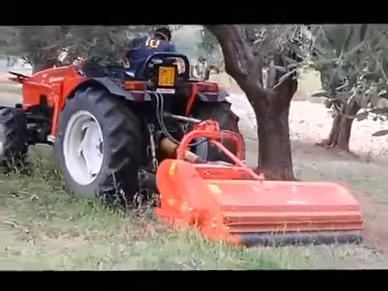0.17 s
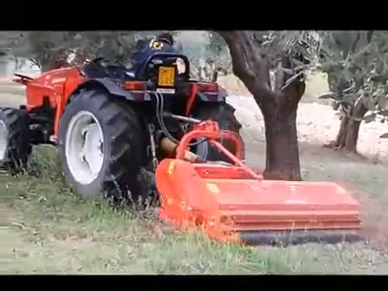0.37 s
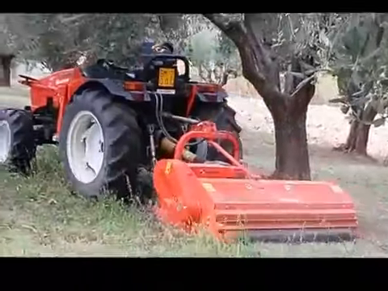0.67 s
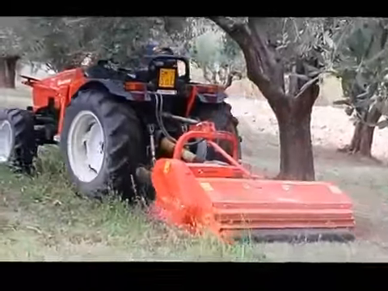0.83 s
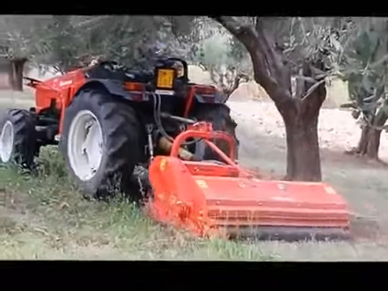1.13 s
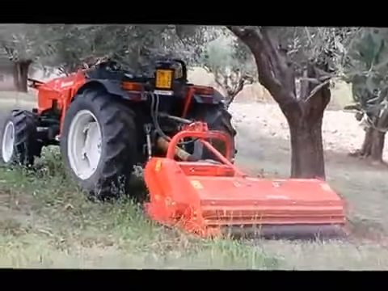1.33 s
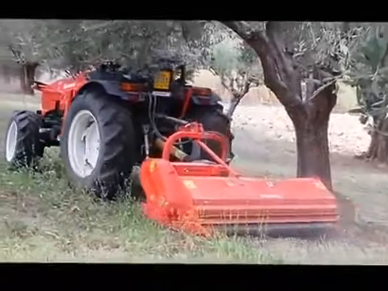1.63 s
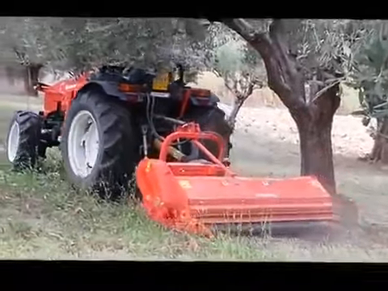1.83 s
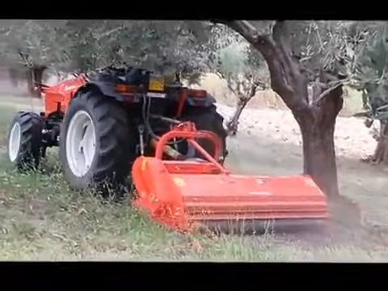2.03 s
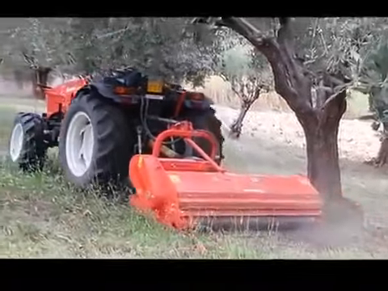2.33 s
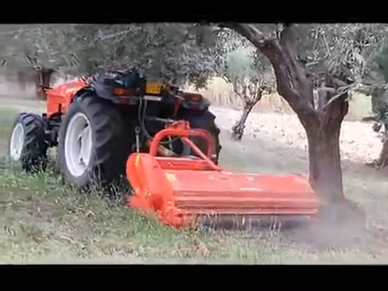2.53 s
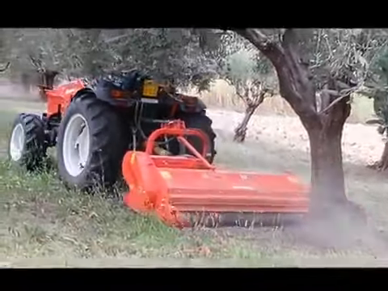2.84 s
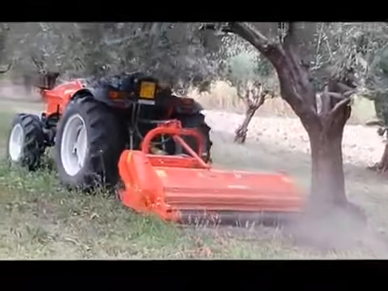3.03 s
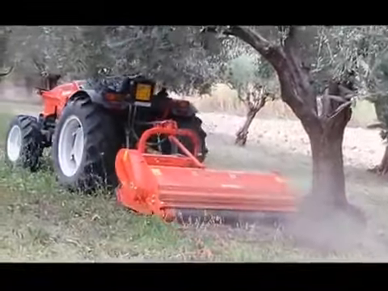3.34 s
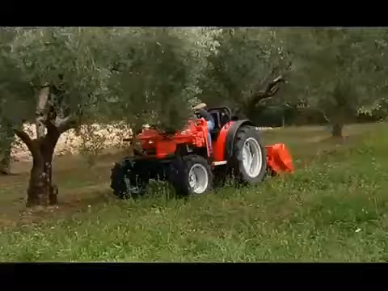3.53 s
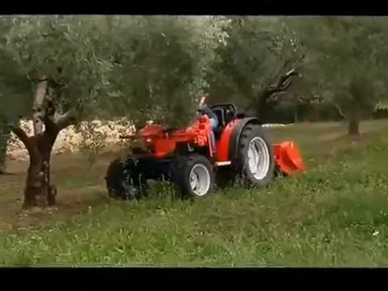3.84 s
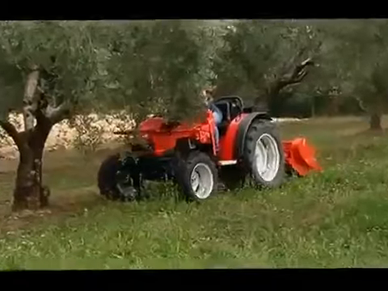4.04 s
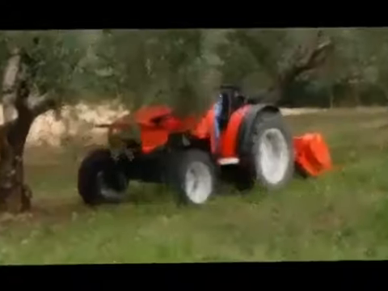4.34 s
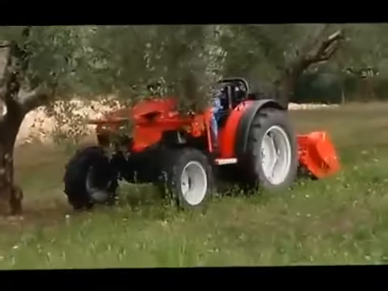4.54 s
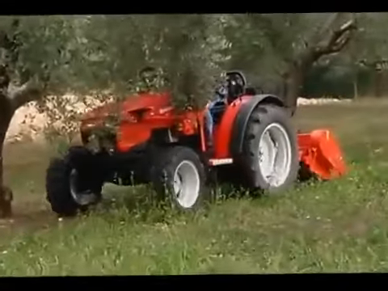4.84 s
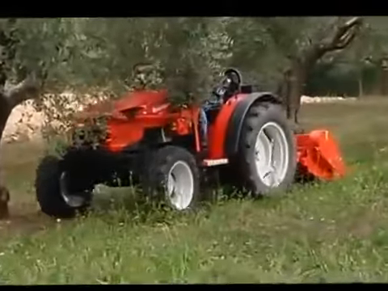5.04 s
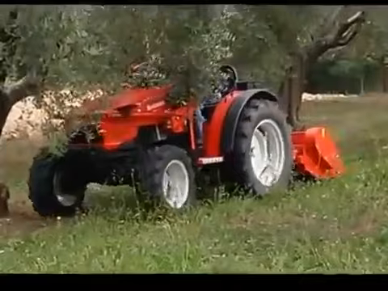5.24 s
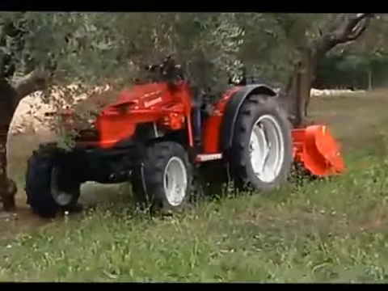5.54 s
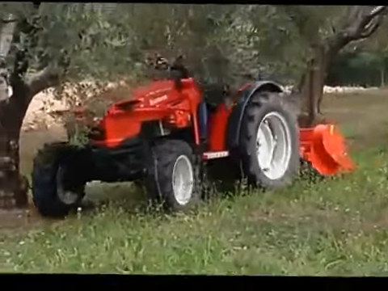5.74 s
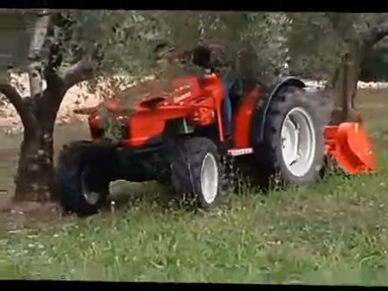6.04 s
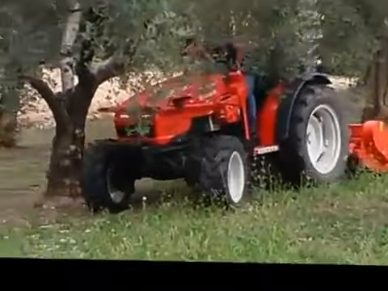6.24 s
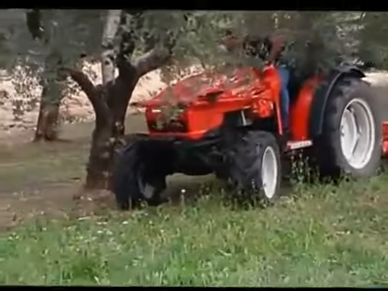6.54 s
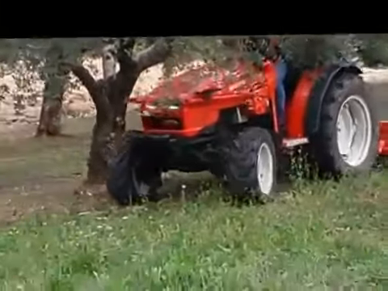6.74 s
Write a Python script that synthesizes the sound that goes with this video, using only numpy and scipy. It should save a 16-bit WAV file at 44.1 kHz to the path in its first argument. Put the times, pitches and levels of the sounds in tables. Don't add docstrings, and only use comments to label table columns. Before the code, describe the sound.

Close behind a working tractor outdoors, a low diesel drone and rattling sheet-metal roar mix with bright, crackling shredding of grass. Tufts and twigs snap in uneven bursts and stones knock the steel hood. The noise thins, cuts to silence for under a second, then returns from the front as a steadier, darker drone with light clatter and a few ticks.

```python
import sys
import numpy as np
from scipy import signal
from scipy.fft import rfft, irfft, next_fast_len
from scipy.io import wavfile
from scipy.ndimage import uniform_filter1d

SR = 44100
rng = np.random.default_rng(int(sys.argv[2]) if len(sys.argv) > 2 else 0)


def volts_from_db(level):
    exponent = np.asarray(level, float) / 20
    return 10 ** exponent


def inscribe(sig):
    pcm = np.round(np.clip(np.atleast_2d(sig).T, -1, 1) * 32767)
    wavfile.write(sys.argv[1], SR, pcm.astype(np.int16))


N = 303849
SIZE = next_fast_len(N)
HZ = np.maximum(np.arange(SIZE // 2 + 1) * SR / SIZE, 1)
TIME = np.arange(N) / SR
SPLIT_S = 4.1

# (behind [Hz], front [Hz])
FIRING_HZ = (56.95, 58.26)
# (multiple of firing [-], level re second order [dB])
ORDERS_BEHIND = [(3, -9), (4, -14), (4.25, -14), (5, -16), (2.25, -18), (3.33, -14.5)]
# (multiple of firing [-], level re second order [dB])
ORDERS_FRONT = [(1.5, -15), (3, -16), (3.5, -11.5), (4, -10.5), (4.25, -15.5), (4.85, -17.5), (1.25, -21)]
# (multiple of tooth rate [-], level re roar [dB])
PUMP_BEHIND = [(3, -11), (5, -11.5), (6, -16), (7, -18), (8, -15)]
# (multiple of tooth rate [-], level re roar [dB])
PUMP_FRONT = [(3, -8.5), (6, -21)]
# (frequency [Hz], density [dB per Hz])
ROAR_BEHIND = [(35, -69.5), (70, -60.5), (130, -60.5), (250, -60.5), (400, -67), (470, -73), (540, -69),
               (600, -64.5), (760, -58.5), (930, -61), (1200, -61.5), (1450, -59.5), (1600, -61),
               (2000, -61), (2500, -63.5)]
# (frequency [Hz], density [dB per Hz])
ROAR_FRONT = [(35, -76), (70, -64.5), (130, -58.5), (250, -61), (400, -70), (520, -67.5), (600, -63),
              (760, -58.5), (930, -66.5), (1200, -61.5), (1450, -63), (1600, -64), (2000, -61), (2500, -65)]
# (frequency [Hz], width [Hz], gain [dB])
RINGS_BEHIND = [(703, 29, 5), (1437, 70, 3), (1600, 40, 4.5), (2100, 65, 3.5), (2950, 73, 2),
                (250, 14, 3.5)]
# (frequency [Hz], width [Hz], gain [dB])
RINGS_FRONT = [(709, 34, 5.8), (844, 30, 6.6), (1457, 80, 4), (1916, 56, 4.6), (2047, 50, 5.1),
               (2270, 45, 4.1)]
# (frequency [Hz], density [dB per Hz])
LEFT_BEHIND = [(1500, -63.5), (2100, -60.5), (2600, -61.5), (3400, -63.5), (3800, -63.5), (4100, -55),
               (5400, -56.5), (6000, -57.5), (8000, -57), (9800, -68), (11000, -67), (12500, -79.5),
               (14000, -70.5), (15500, -86)]
# (frequency [Hz], density [dB per Hz])
RIGHT_BEHIND = [(1500, -62), (2000, -56), (3000, -57), (3300, -67), (3800, -59), (4600, -60), (5000, -68),
                (6000, -61), (7200, -56.5), (7900, -50), (9000, -57.5), (11500, -63), (13000, -67.5),
                (15500, -75.5)]
# (frequency [Hz], density [dB per Hz])
LEFT_FRONT = [(1500, -61.5), (2050, -67.5), (2600, -70), (3300, -74.5), (3800, -74), (4300, -69.5),
              (5000, -67.5), (6200, -61.5), (7000, -67.5), (8200, -75.5), (10500, -75), (11300, -92),
              (13000, -90), (15500, -101.5)]
# (frequency [Hz], density [dB per Hz])
RIGHT_FRONT = [(1500, -59.5), (2050, -65), (2600, -70), (3300, -69.5), (3900, -84), (4400, -78),
               (5200, -72), (6500, -70.5), (7600, -56.5), (8200, -59), (9500, -66.5), (10800, -74.5),
               (12300, -71.5), (15500, -84)]
# (frequency [Hz], left-right correlation [-])
ALIKE_BEHIND = [(60, 0.88), (290, 0.8), (640, 0.79), (1400, .75), (2756, .65), (3150, 0.12), (3500, .5),
                (4000, 0.27), (5500, 0.089), (7700, .3), (15000, .05)]
# (frequency [Hz], left-right correlation [-])
ALIKE_FRONT = [(60, 1), (290, 0.87), (640, 0.95), (1400, 0.96), (3100, 1), (3450, 0.092), (6200, 0.36),
               (9000, 0.11), (15000, .05)]
# (frequency [Hz], phase [rad])
PORT_PHASE_RAD = [(2900, 0), (3500, 3.0), (4500, 4.5), (6200, 7.8), (8000, 8.3)]
# (time [s], recorder gain [dB], grass load on flails [dB])
WORK = [
    [(0.0, -2, -7), (0.21, -0.6, -3.5), (0.42, -.8, 0.3), (0.77, 0.7, -1.5), (1.0, -2.1, 5.5),
     (1.4, -1.7, 4.5), (1.55, 0.4, -1), (1.85, 2.5, -2), (2.25, -0.5, 6), (2.36, 2.2, 0.5),
     (2.5, -0.5, 5.5), (2.6, -7, 7.5), (2.83, -7.5, 0.8), (2.95, -11, 0.5), (3.3, -12, -2),
     (3.7, -3.5, -4.5)],
    [(4.6, 0, -0.9), (6.8, 0.16, 0.45)],
]
# (firing [dB], second order [dB], rotor [dB], roar [dB], shredding [dB])
LEVELS_DB = [
    (-35.5, -33.5, -35, -31.5, -24.5),
    (-31.5, -34, -40.5, -32, -29),
]
# (time [s], peak [dB], left-right [dB],
# fall [ms])
TUFTS = [(0.2344, -8.5, -1.1, 35), (0.33, -1.5, 0.8, 37), (0.4094, -9.5, -1, 29), (0.4703, -7, -6.5, 18),
         (0.4958, -11, -8, 18), (0.6514, -9, -2, 24), (0.6944, -9.5, -1, 14), (0.8294, -4, 1, 62),
         (0.9144, -11, -4, 21), (1.044, 0.5, 1.2, 24), (1.0694, -7, 3, 21), (1.1294, -8.5, -4.5, 18),
         (1.2594, -11, -5.5, 18), (1.4157, -2, 2.5, 14), (1.6044, -6.5, 3.5, 14), (1.8694, -10, -3, 18),
         (1.948, -7.5, 7, 16), (2.0253, -7.5, 5, 18), (2.074, -5.5, 2.5, 22), (2.128, -3.5, 2, 27),
         (2.1894, -5.5, 4, 22), (2.2303, -6, 4, 27), (2.271, -4, 8, 18), (2.3894, -8.5, -2, 30),
         (2.4494, -4, 6, 24), (2.5044, -8, 4.5, 26), (2.5694, -8, 3.5, 35), (2.6214, -10.5, 3.5, 32),
         (2.6725, -9.5, 2.5, 9.7),
         (2.7794, -17, 4.5, 22), (2.832, -7, 2, 22), (2.945, -13.5, 6.5, 35), (3.0415, -17.5, -8, 15),
         (3.424, -13.5, -0.5, 30), (3.4642, -18, 5, 28), (3.5494, -18, 3.5, 18), (3.677, -16.5, 1, 22),
         (3.698, -7, 0.5, 20), (6.1072, -18.5, 7.5, 18), (6.322, -19.5, -9, 16), (6.846, -5, 8.5, 20),
         (6.8744, -9, 6, 16)]
# (time [s], peak [dB], panel index, rounded down [-], rise [ms])
STONES = [(2.5553, -2, 0.5, .4), (.3318, -13, 0, 0.34), (2.8335, -10, 5, .4), (6.2, -19, 5, .3),
          (6.3235, -16.5, 5, 0.32), (3.546, -26, 1.5, 5.2), (1.52, -20.5, 2, 2.7), (6.847, -13.5, 3, 0.66),
          (2.503, -19.5, 4, 3), (6.2, -20, 5, .3), (5.2485, -14, 5, .3), (5.3378, -13, 5, 0.34),
          (2.955, -32, 4.5, 4.0)]
# (frequency [Hz], level [dB], t60 [s])
PANELS = [
    [(4694, 1.5, .015), (4320, -4.5, 0.011), (5200, -4.5, .01), (5030, -11, 0.087), (14500, -10, .006)],
    [(1974, 4, .13), (2780, -5.5, .11), (4511, 1, 0.13), (5496, -6, .1), (6681, -13.5, .12),
     (7897, -14.5, .16)],
    [(7140, 6, .08)],
    [(3400, -9.5, 0.11), (5460, -2.5, 0.1), (6580, 0.5, 0.075), (7130, 2, .04)],
    [(672, -4.5, 0.19), (817, -2.5, .12), (1039, -0.5, .1), (1403, -1.5, 0.11), (1590, 0, 0.13)],
    [(5230, 0, 0.0074), (6670, 0, 0.0074), (7800, 0, 0.011)],
]


def in_time(rows):
    time_s, *columns = np.transpose(rows)
    return [np.interp(TIME, time_s, column) for column in columns]


def at_hz(points):
    hz, value = np.transpose(points)
    return np.interp(np.log(HZ), np.log(hz), value)


def drift(rate_hz):
    pole = np.exp(-80 * np.pi * rate_hz / SR)
    noise = rng.standard_normal(N // 40 + 2002)
    slow = signal.lfilter([1], [1, -2 * pole, pole * pole], noise)[2000:]
    return np.interp(np.arange(N) / 40, np.arange(len(slow)), slow / slow.std())


def slope(corner_hz, db_per_octave):
    return -np.maximum(np.log2(corner_hz / HZ) * db_per_octave, 0)


def humps(rings):
    return sum(db / (1 + (2 * (HZ - hz) / width_hz) ** 2) for hz, width_hz, db in rings)


def colour(pair, left_db, right_db, alike, low_hz, high_hz):
    mid, side = rfft(pair, SIZE)
    likeness = at_hz(alike)
    gains = volts_from_db(np.array([left_db, right_db]))
    band = (HZ > low_hz) & (HZ < high_hz)
    gains = gains / np.sqrt(np.sum(gains[:, band] ** 2) / 2 / len(HZ))
    common = np.sqrt((1 + likeness) / 2) * mid
    ports = common + np.sqrt((1 - likeness) / 2) * side * [[1], [-1]]
    ports[1] *= np.exp(1j * at_hz(PORT_PHASE_RAD))
    return irfft(gains * ports, SIZE)[:, :N]


def tones(turns, table, wobble_db):
    total = 0
    for multiple, db in table:
        phase = 2 * np.pi * (multiple * turns + rng.random())
        total = total + volts_from_db(db + wobble_db * drift(3.6)) * np.sin(phase)
    return total


def engine(turns, firing_db, second_db, rotor_db, orders):
    swell = [volts_from_db(0.8 * drift(4)) for _ in range(3)]
    firing = swell[0] * volts_from_db(firing_db) * np.cos(2 * np.pi * turns)
    second = swell[1] * volts_from_db(second_db) * np.cos(4 * np.pi * turns + 0.23)
    rotor = swell[2] * volts_from_db(rotor_db) * np.sin(2 * np.pi * 1.673 * turns)
    weaker = volts_from_db(second_db) * tones(turns, orders, wobble_db=2.5)
    sway = volts_from_db(0.5 * drift(6) * [[1], [-1]])
    return np.sqrt(2) * sway * (firing + second + rotor + weaker)


def throb(turns, depth):
    beat = np.cos(2 * np.pi * turns + 1.0)
    beat += 0.8 * np.cos(np.pi * turns) + 0.9 * np.cos(np.pi * turns / 2)
    return np.exp(depth * beat)


def body_roar(snaps, beat, roar, rings, alike):
    spectrum_db = at_hz(roar) + humps(rings) + slope(2500, -24)
    shaking = snaps[:, ::-1] * beat * volts_from_db(1.2 * drift(9))
    return colour(shaking, spectrum_db, spectrum_db, alike, 500, 1522)


def pump_whine(turns, pump, load_db):
    teeth = 3.543 * turns + 0.03 * drift(8)
    level_db = -0.45 * load_db - 0.9 + 2.2 * drift(11)
    return volts_from_db(level_db) * np.sqrt(2) * tones(teeth, pump, wobble_db=3)


def grass_snaps(per_s=5000, spread_db=2.4, hiss=0.6):
    sizes = volts_from_db(spread_db * np.minimum(rng.exponential(1, (2, N)), 5))
    sizes = sizes * rng.choice([-1, 1], (2, N))
    snaps = sizes * (rng.random((2, N)) < per_s / SR)
    return np.sqrt(1 - hiss) * snaps / snaps.std() + np.sqrt(hiss) * rng.standard_normal((2, N))


def shredding(snaps, beat, turns, clatter, left, right, rings, alike):
    pulse = np.exp(0.9 * clatter * np.cos(2 * np.pi * turns + 1.2))
    torn = snaps * beat ** 0.64 * pulse * volts_from_db(drift(30))
    left_db, right_db = at_hz(left), at_hz(right)
    top_db = slope(3400, 40)
    under_db = slope(3400, -40) + slope(2000, 9) + humps(rings)
    bright = colour(torn, left_db + top_db, right_db + top_db, alike, 3400, 12030)
    dull = colour(torn, left_db + under_db, right_db + under_db, alike, 1200, 3400)
    return bright, dull


def one_pass(work, levels_db, firing_hz, orders, pump, roar, rings, left, right, alike, clatter,
             bursts, snaps):
    gain_db, load_db = in_time(work)
    firing_db, second_db, rotor_db, roar_db, shred_db = (db + gain_db for db in levels_db)
    roar_db = roar_db + 0.65 * load_db
    shred_db = shred_db + load_db
    turns = np.cumsum(firing_hz * (1 + 0.0008 * drift(1.5))) / SR
    beat = throb(turns, clatter)
    tonal = engine(turns, firing_db, second_db, rotor_db, orders)
    body = body_roar(snaps, beat, roar, rings, alike)
    whine = pump_whine(turns, pump, load_db)
    bright, dull = shredding(snaps, beat, turns, clatter, left, right, rings, alike)
    shred = np.hypot(volts_from_db(shred_db + 3.0), bursts[0]) * bright
    shred += np.hypot(volts_from_db(roar_db - 2.5), bursts[1]) * dull
    return tonal + volts_from_db(roar_db - 0.71) * (body + whine) + shred


def tufts():
    rise_ms, hold_ms = 3.6, 13
    gains = np.zeros((2, 2, N))
    for time_s, peak_db, pan_db, fall_ms in TUFTS:
        at = int(time_s * SR)
        ms = np.arange(min(SR // 5, N - at)) * 1000 / SR
        rise = 1 - np.exp(-ms / rise_ms)
        fall = np.exp(-np.maximum(ms - hold_ms, 0) / fall_ms)
        burst = volts_from_db(peak_db - 11) * rise * fall * volts_from_db([[pan_db / 2], [-pan_db / 2]])
        dull_db = min(-12.5 + pan_db, -7)
        if time_s > SPLIT_S:
            dull_db -= 8
        gains[0, :, at:at + len(ms)] += burst
        gains[1, :, at:at + len(ms)] += volts_from_db(dull_db) * burst
    return gains


def stones():
    out = np.zeros((2, N))
    for time_s, peak_db, panel, rise_ms in STONES:
        at = int(time_s * SR)
        t = np.arange(min(SR // 4, N - at)) / SR
        rise = 1 - np.exp(-t * 1000 / rise_ms)
        for hz, level_db, t60_s in PANELS[int(panel)]:
            ring = volts_from_db(peak_db + level_db - 60 * t / t60_s) * rise
            phase = 2 * np.pi * (hz * t + rng.random((2, 1)) * 0.17)
            out[:, at:at + len(t)] += ring * np.sin(phase) * volts_from_db([[2.5], [-2.5]])
    return out


def cut():
    cut_s, tail_s, tail_db_per_root_s = 3.7205, 0.075, 270
    open_s, open_gain, fade_in_s = 4.468, 0.06, 0.094
    after_s = np.maximum(TIME - cut_s, 0)
    tail = volts_from_db(-tail_db_per_root_s * np.sqrt(after_s)) * (after_s < tail_s)
    fade_in = np.minimum(open_gain + (TIME - open_s) / fade_in_s, 1) * (TIME > open_s)
    return np.where(TIME < SPLIT_S, tail, fade_in)


def spectral_thinning(x, margin_db, mid_margin_db, top_db, weak_share):
    frame = dict(window="cosine", nperseg=2048, noverlap=1024)
    left_right = signal.stft(x, **frame)[2][:, :1024]
    budget = volts_from_db(2.4 * rng.standard_normal((64, left_right.shape[2]))).repeat(2, axis=0)
    lines = (np.arange(1024) > 40)[:, None]

    def thinned(pair, under_db):
        power = abs(pair) ** 2
        bands = power.reshape(2, 128, 8, -1).mean(axis=2)
        near = uniform_filter1d(bands, size=2, axis=2)
        floor = volts_from_db(top_db) ** 2 * near[:, 20:60].mean(axis=1, keepdims=True)
        around = uniform_filter1d(near, size=15, axis=1) + floor
        keep = near * budget > around * volts_from_db(-under_db) ** 2
        keep[:, :14] = True
        strong = power > weak_share * lines * near.repeat(8, axis=1)
        return pair * keep.repeat(8, axis=1) * strong

    swap = np.array([[1, 0.96], [1, -1]]) / np.sqrt(2)
    mid_side = np.tensordot(swap, thinned(left_right, margin_db), 1)
    mid_side = thinned(mid_side, mid_margin_db)
    frames = np.pad(np.tensordot(swap, mid_side, 1), ((0, 0), (0, 1), (0, 0)))
    return signal.istft(frames, **frame)[1][:, :N]


def scene():
    bursts, snaps = tufts(), grass_snaps()
    behind = one_pass(WORK[0], LEVELS_DB[0], FIRING_HZ[0], ORDERS_BEHIND, PUMP_BEHIND, ROAR_BEHIND,
                      RINGS_BEHIND, LEFT_BEHIND, RIGHT_BEHIND, ALIKE_BEHIND,
                      clatter=0.03, bursts=bursts, snaps=snaps)
    front = one_pass(WORK[1], LEVELS_DB[1], FIRING_HZ[1], ORDERS_FRONT, PUMP_FRONT, ROAR_FRONT,
                     RINGS_FRONT, LEFT_FRONT, RIGHT_FRONT, ALIKE_FRONT,
                     clatter=0.11, bursts=bursts, snaps=snaps)
    return np.where(TIME < SPLIT_S, behind, front) + stones()


def band_limit(x):
    return signal.sosfilt(signal.butter(12, 15520, fs=SR, output="sos"), x)


def record(dry):
    limited = 1.05 * np.tanh(dry / 1.05)
    thinned = spectral_thinning(limited, margin_db=10.0, mid_margin_db=6.0, top_db=-9.5, weak_share=0.3)
    return band_limit(thinned * volts_from_db(0.56) * cut())


dry = scene()
out = record(dry)
inscribe(out)
```